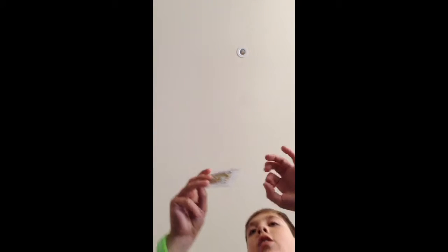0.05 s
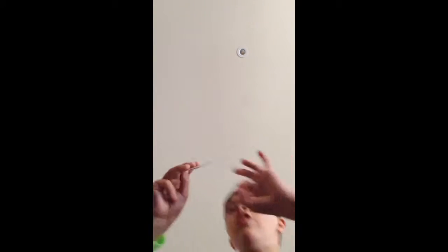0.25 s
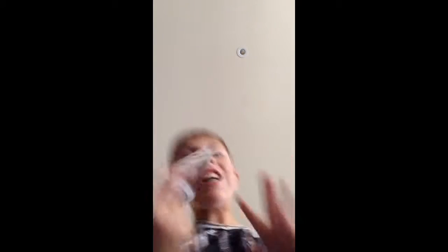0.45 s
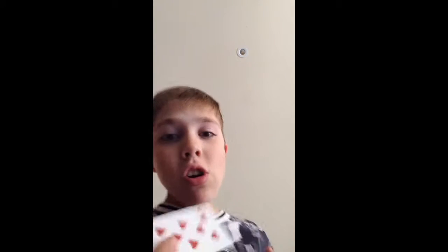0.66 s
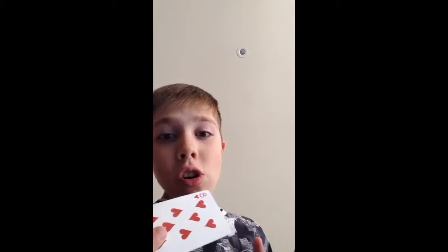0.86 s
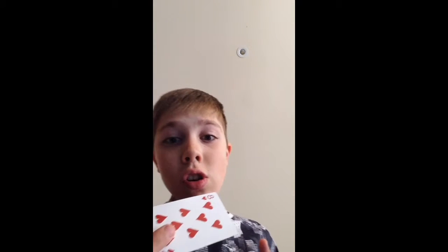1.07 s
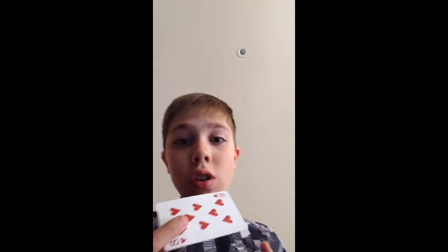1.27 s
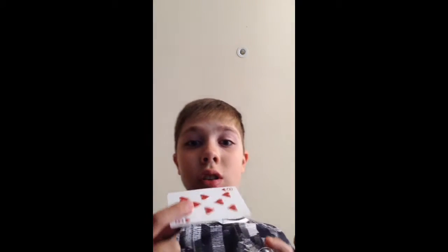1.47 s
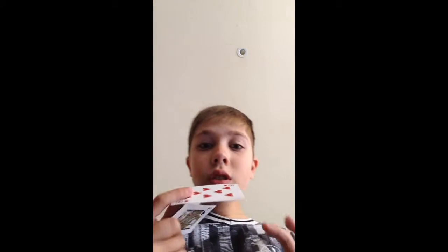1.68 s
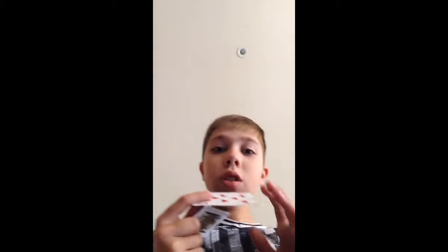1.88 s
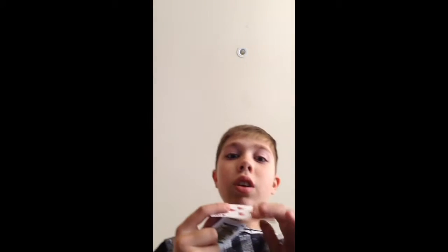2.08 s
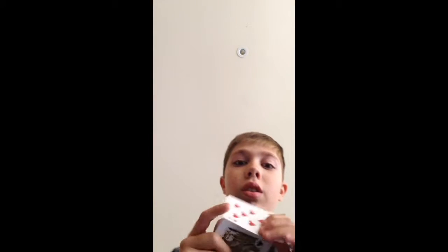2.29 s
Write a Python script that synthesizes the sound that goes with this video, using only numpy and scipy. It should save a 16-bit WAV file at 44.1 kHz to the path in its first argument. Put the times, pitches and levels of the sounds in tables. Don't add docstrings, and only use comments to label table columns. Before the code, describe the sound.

Cards settle softly with small ticks, then a finger flick makes a hard, dry crack with a quick flutter. The small room rings briefly; faint hiss and hum remain until cards slide and tick again.

```python
import sys
import numpy as np
from scipy import signal
from scipy.fft import rfft, irfft
from scipy.io import wavfile
from scipy.ndimage import uniform_filter1d

SR = 44100
rng = np.random.default_rng(int(sys.argv[2]) if len(sys.argv) > 2 else 0)


def ratio_of_db(decibels):
    return 10 ** (np.asarray(decibels, float) / 20)


def waveform_to_disk(signal):
    frames = np.transpose(np.atleast_2d(signal))
    scaled = np.clip(frames, -1, 1) * 32767
    samples = np.round(scaled).astype(np.int16)
    wavfile.write(sys.argv[1], SR, samples)


N = 103458
END_S = 2.346
BASS_CUT_HZ, TOP_HZ = 110, 15500

# hz, density_db
AIR_COLOUR = [(29, -57), (50, -46), (217, -7.5), (251, -5), (352, -11), (597, -12.5), (1090, -27),
              (5480, -27), (15800, -30)]
AIR_DB = -72.0
# hz, rms_db
HUM = [(545, -85), (596, -82.5), (743, -86.5)]
# hz, rms_db
MOTOR = [(84, -97), (168, -79), (252, -74.5), (335, -79)]
# time_s, level_db
MOTOR_LOAD = [(.7, -2.5), (.95, 2), (1.08, -2.5), (1.25, -1), (1.45, -6), (2.3, -4)]

# time_s, pressure_db
SETTLE = [(0, -45.5), (.006, -39.5), (.03, -45), (.07, -48.5), (.15, -55), (.25, -58.5), (.36, -61),
          (.4, -78)]
# hz, density_db
SETTLE_COLOUR = [(150, -10), (450, 0.5), (850, -1.5), (1500, -8.5), (2200, -3), (3800, -19), (5300, -22),
                 (6500, -38.5)]
# time_s, pressure_db
DRAG = [(.362, -85.5), (.372, -56), (.385, -42), (.4, -31.5), (.425, -37.5), (.435, -43), (.45, -35.5),
        (.47, -46), (.52, -63)]
# hz, density_db
DRAG_COLOUR = [(200, -6), (800, 0.5), (3000, -5.5), (4000, -11), (5200, -7), (6800, -12.5), (8500, -7),
               (15000, -20)]
# time_s, pressure_db
SLIDE = [(.45, -67), (.55, -53.5), (.7, -59.5), (0.879, -68), (0.961, -80.5), (1.4, -81), (1.7, -75.5),
         (1.8, -73.5), (1.815, -61), (1.85, -65.5), (2.0, -66), (2.15, -61), (2.271, -54), (2.304, -50),
         (2.35, -45.5)]
# hz, density_db
SLIDE_COLOUR = [(150, -18), (600, 3), (1600, 2), (3400, 1.5), (4100, -18), (5400, -11.5), (6800, -18.5),
                (14000, -31.5)]
SLIPS_PER_S, SLIP_SPREAD_DB = 9700, 0.5

# start_s, peak_db, ring_hz, ring_t60_s, card_body_db
TICKS = [(.004, -30.5, 847, 0.05, 1.5), (.012, -36.5, 2196, 0.04, 0), (0.041, -44, 5260, .02, 1.5),
         (.066, -44.5, 444, 0.1, -9), (0.2464, -31, 1360, 0.0093, -18), (0.3078, -44.5, 2970, 0.013, -10.5),
         (0.3257, -52.5, 5000, .006, -14), (.568, -47, 8640, 0.0059, 6), (.615, -58.5, 9000, 0.0075, -5),
         (.75, -55, 5320, 0.0074, -12), (1.812, -51.5, 2573, 0.022, 3.5), (2.043, -50.5, 5500, .006, 4),
         (2.199, -39.5, 1600, 0.013, -16), (2.263, -46, 3000, 0.016, -13), (2.2945, -40.5, 2710, 0.019, 3),
         (2.3044, -31.5, 2560, 0.022, 1.5), (2.3208, -27.5, 2980, 0.033, -19),
         (2.3239, -22.5, 3070, 0.025, -4), (2.326, -43.5, 330, 0.098, -19)]
# start_s, peak_db, ring_hz, ring_t60_s, card_body_db
SNAPS = [(.3682, -29.5, 1900, 0.005, -11), (.3845, -30, 750, 0.018, -7), (.3972, -3, 2300, 0.0034, -4),
         (.3973, -15.5, 820, 0.011, -14), (.3988, -16.5, 3050, .014, -11.5),
         (.4016, -16.5, 2900, 0.014, -6), (.4115, -19, 8300, 0.0018, 0), (.4122, -9.5, 2300, .007, -13.5),
         (.4140, -17.5, 2300, 0.0072, -9), (.4373, -11, 1150, 0.0068, -13),
         (.4466, -23, 10300, 0.0049, -3.5), (.4480, -25.5, 720, 0.037, -9), (.4490, -18, 1900, 0.018, -5.5),
         (.4504, -19, 8300, 0.0036, -5), (.4512, -18, 1900, 0.0095, -5.5), (.4515, -17, 335, 0.027, -15.5),
         (.4645, -35, 9100, 0.0032, 8)]
# hz, level_db, t60_s
CARD_MODES = [(346, -20, .03), (820, -7, .02), (1587, -2, .01), (2370, -5, .008), (2998, -1, .01),
              (3350, -16.5, 0.0084), (5050, -9, .012)]
# hz, density_db
CRACK_COLOUR = [(2500, -16.5), (4000, -7.5), (5000, 1.5), (6600, -9), (8000, 1.5), (9200, -4), (11500, -14),
                (15000, -20)]
SNAP_CRACK_DB, TICK_CRACK_DB, CRACK_T60_S = -9.5, -26.5, 0.017
CRACKLE_DB, CRACKLE_T60_S = -9.5, 0.0054
RISE_CYCLES = 0.6

# hz, t60_s
WALL_DECAY = [(200, 0.76), (700, .55), (2500, 0.56), (5000, 0.54), (10000, 0.27)]
# hz, level_db
WALL_COLOUR = [(100, -5), (340, 3.5), (1000, 0), (3000, 0.5), (4000, -3), (12000, 3.5)]
WALL_DB, WALL_DELAY_S = -10.5, 0.004

# start_s, length_s, level_db, from_hz, to_hz, width_hz
SCRAPE = (1.43, .09, -68, 1220, 1340, 150)


def evened(x):
    return x / np.sqrt(np.mean(x ** 2) + 1e-20)


def read(points, hz):
    table_hz, value = np.transpose(points)
    return np.interp(np.log(hz + 1), np.log(table_hz + 1), value)


def colour(x, points):
    gain = ratio_of_db(read(points, np.fft.rfftfreq(len(x), 1 / SR)))
    return irfft(rfft(x) * gain, len(x))


def follow(curve):
    time_s, level_db = np.transpose(curve)
    return ratio_of_db(np.interp(np.arange(N) / SR, time_s, level_db))


def wander(fastest_hz):
    t = np.arange(N) / SR
    rates_hz = fastest_hz * np.geomspace(0.1, 1, num=8)
    return evened(sum(np.sin(2 * np.pi * (hz * t + rng.random())) for hz in rates_hz))


def add(mix, start_s, sound):
    part = mix[max(round(start_s * SR), 0):][:len(sound)]
    part += sound[:len(part)]


def hum_line(hz, rms_db):
    t = np.arange(N) / SR
    level = np.sqrt(2) * ratio_of_db(rms_db + 2.5 * wander(3.6))
    return level * np.sin(2 * np.pi * (hz * t + 0.0994 * wander(9)))


def background():
    motor = follow(MOTOR_LOAD) * sum(hum_line(*row) for row in MOTOR)
    hum = motor + sum(hum_line(*row) for row in HUM)
    return ratio_of_db(AIR_DB) * evened(colour(rng.standard_normal(N), AIR_COLOUR)) + hum


def slide(pressure, points):
    spread_db = SLIP_SPREAD_DB * np.minimum(rng.exponential(1, N), 5)
    size = ratio_of_db(spread_db) * rng.standard_normal(N)
    slips = size * (rng.random(N) < SLIPS_PER_S / SR)
    t = np.arange(N) / SR
    touching = (t >= pressure[0][0]) * (t <= pressure[-1][0])
    unsteady = ratio_of_db(1.6 * wander(40))
    return evened(colour(slips, points)) * follow(pressure) * unsteady * touching


def ring(hz, t60_s):
    t = np.arange(4096) / SR
    rise = np.sin(np.pi / 2 * np.minimum(t * hz / RISE_CYCLES, 1)) ** 2
    return rise * ratio_of_db(-60 * t / max(t60_s, 1e-3)) * np.sin(2 * np.pi * hz * t)


def snap(peak_db, ring_hz, ring_t60_s, card_body_db, crack_db, noise):
    t = np.arange(len(noise)) / SR
    blow = ratio_of_db(CRACKLE_DB - 60 * t / CRACKLE_T60_S) * noise
    blow[0] = 1
    modes = sum(ratio_of_db(db) * ring(hz, t60_s) for hz, db, t60_s in CARD_MODES)
    body = signal.fftconvolve(blow, modes)[:4096] / 2
    crack = evened(colour(noise[::-1], CRACK_COLOUR))
    body[:len(t)] += ratio_of_db(crack_db - 60 * t / CRACK_T60_S) * crack
    return ratio_of_db(peak_db) * (ring(ring_hz, ring_t60_s) + ratio_of_db(card_body_db) * body)


def walls(x):
    taps, slots = np.zeros(SR), np.arange(0, SR - 20, 20)
    taps[slots + rng.integers(0, 20, len(slots))] = rng.choice([-1., 1.], len(slots))
    hz, t, bands = signal.stft(taps, SR, nperseg=256)
    decay_db = -60 * t / read(WALL_DECAY, hz)[:, None]
    bands = bands * ratio_of_db(read(WALL_COLOUR, hz)[:, None] + decay_db)
    tail = signal.istft(bands, SR, nperseg=256)[1]
    tail = np.r_[np.zeros(round(WALL_DELAY_S * SR)), tail / np.linalg.norm(tail)]
    return signal.fftconvolve(x, tail)[:N]


def scrape():
    start_s, length_s, level_db, from_hz, to_hz, width_hz = SCRAPE
    u = np.arange(0, 1, 1 / (length_s * SR))
    slow_noise = uniform_filter1d(rng.standard_normal(9000), int(SR / width_hz))
    fuzz = evened(slow_noise)[:len(u)]
    swell = ratio_of_db(level_db) * np.sin(np.pi * u ** 0.6)
    phase = 2 * np.pi * np.cumsum(from_hz + (to_hz - from_hz) * u) / SR
    return start_s, swell * (1 + fuzz) * np.sin(phase)


def scene():
    air = background()
    cards = slide(SLIDE, SLIDE_COLOUR) + slide(SETTLE, SETTLE_COLOUR) + slide(DRAG, DRAG_COLOUR)
    add(cards, *scrape())
    noises = rng.standard_normal((2, 30, 900))
    for events, crack_db, rows in zip((SNAPS, TICKS), (SNAP_CRACK_DB, TICK_CRACK_DB), noises):
        for (start_s, *blow), noise in zip(events, rows):
            add(cards, start_s, snap(*blow, crack_db, noise))
    bass_cut = signal.butter(4, BASS_CUT_HZ, "high", fs=SR, output="sos")
    in_room = cards + ratio_of_db(WALL_DB) * walls(cards)
    return (signal.sosfilt(bass_cut, in_room) + air)[None]


def roll_off(x):
    return signal.sosfilt(signal.butter(12, 16160, fs=SR, output="sos"), x)


def record(dry):
    low_pass = signal.firwin(255, TOP_HZ, fs=SR)[None]
    heard = signal.oaconvolve(dry, low_pass, "same")
    running = np.arange(N) < END_S * SR
    return roll_off(heard * running)


dry = scene()
out = record(dry)
waveform_to_disk(out)
```